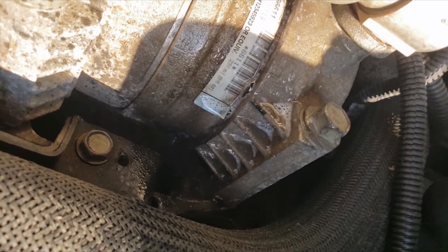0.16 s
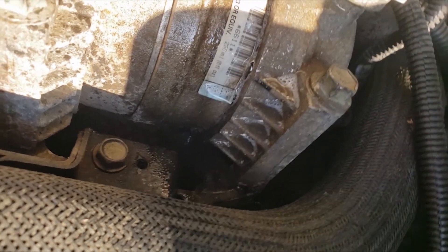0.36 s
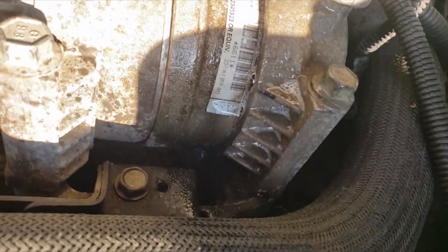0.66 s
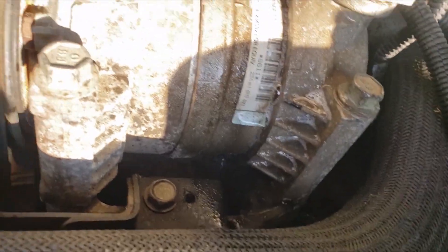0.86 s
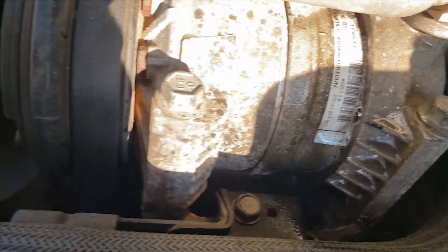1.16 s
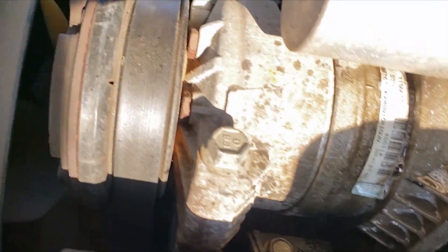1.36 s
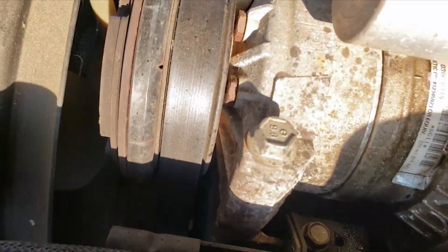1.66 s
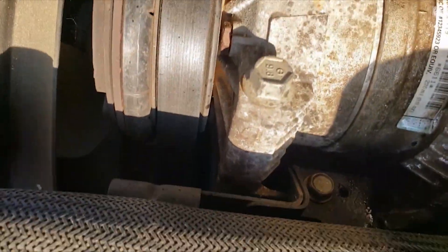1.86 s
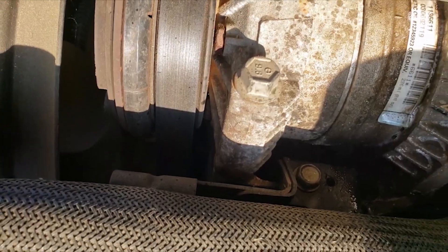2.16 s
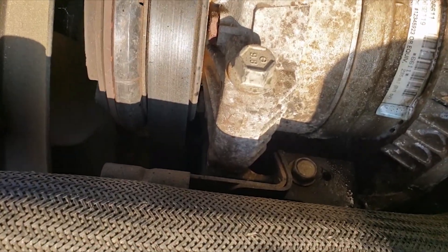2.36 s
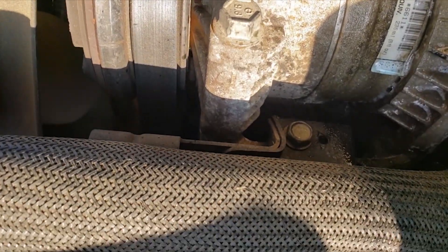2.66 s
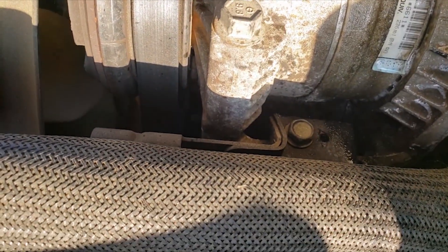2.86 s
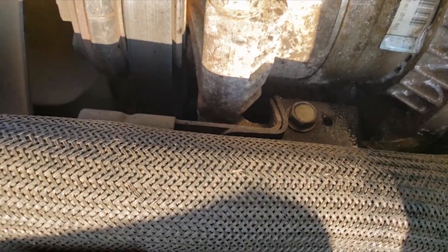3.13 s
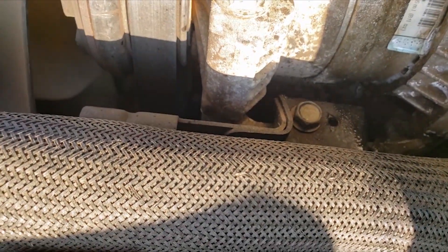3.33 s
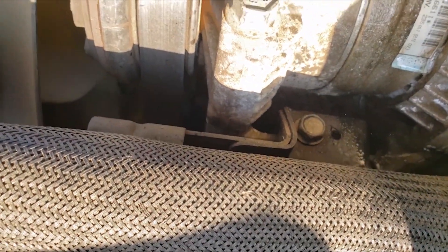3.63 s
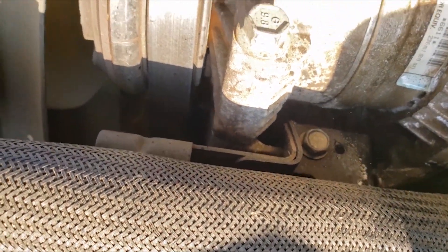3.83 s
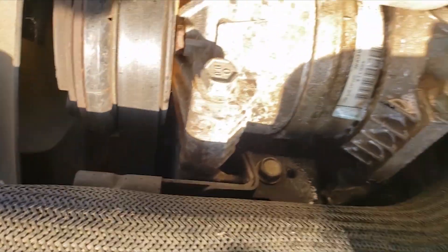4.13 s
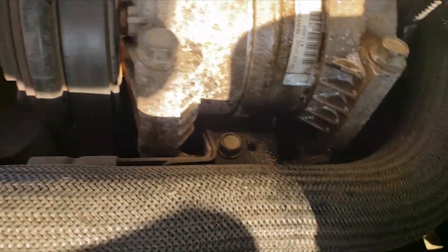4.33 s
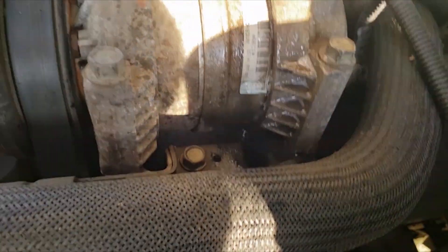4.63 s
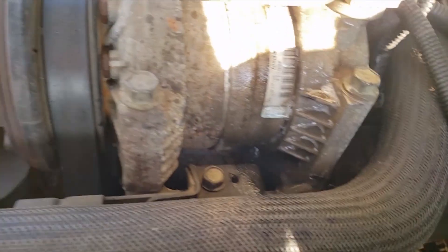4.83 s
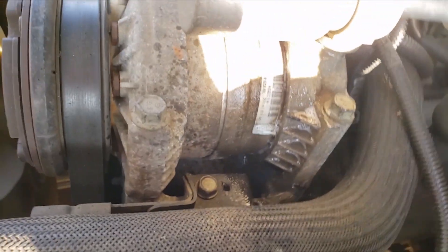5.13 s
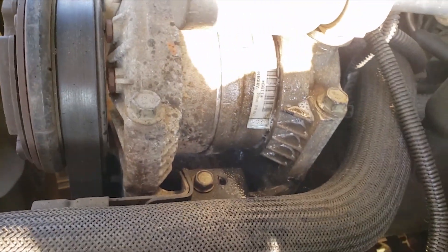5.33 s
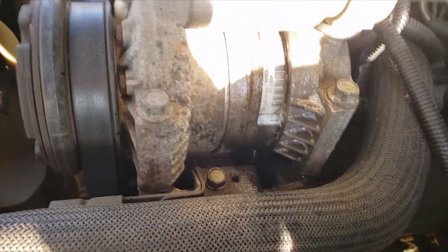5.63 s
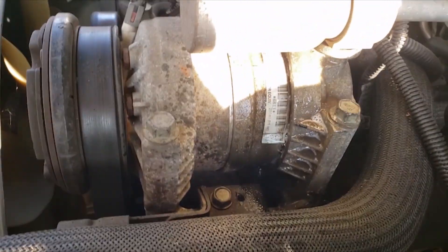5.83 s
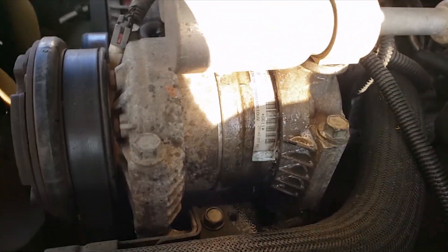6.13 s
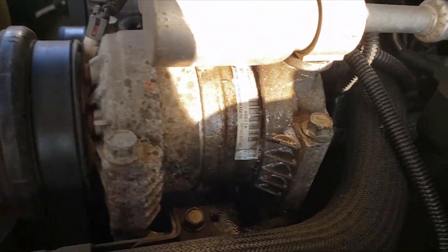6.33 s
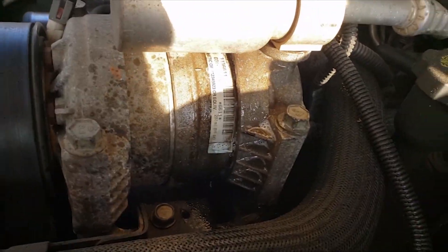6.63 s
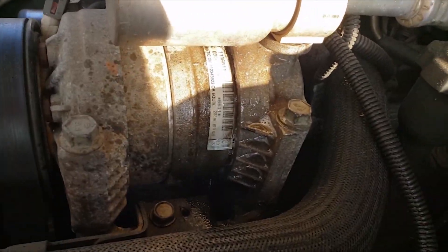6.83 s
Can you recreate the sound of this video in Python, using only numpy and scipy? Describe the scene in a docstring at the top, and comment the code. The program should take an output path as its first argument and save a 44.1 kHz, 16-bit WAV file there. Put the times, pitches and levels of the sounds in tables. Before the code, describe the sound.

At the open engine bay of a parked car, a hand scuffs softly over the parts and bumps hollow plastic close to the microphone. Near the middle, two hard knocks less than a second apart ring the bodywork, each with a small rebound and brief rattle. More light scrapes and ticks follow. Far birds whistle and chirp faintly over a low outdoor rumble, a distant hum and puffs of breeze.

```python
"""At the open engine bay of a parked car, engine off. Two hard knocks ring the bodywork, each with a
small rebound. Close by, a hand scuffs and scrapes over the parts, bumps hollow plastic and makes
small ticks. Far birds give two rising whistles and a few level notes, and a faint run of falling
chirps sits high in the treble. Behind it all are a low outdoor rumble, a far machine's hum,
puffs of breeze and a soft hiss."""
import sys
import numpy as np
from scipy import signal
from scipy.fft import rfft, irfft, next_fast_len
from scipy.io import wavfile
from scipy.ndimage import uniform_filter1d

SR = 44100
rng = np.random.default_rng(int(sys.argv[2]) if len(sys.argv) > 2 else 0)


def waveform_to_disk(signal):
    """Save audio, clipped to [-1, 1], as 16-bit WAV at the path in sys.argv[1]."""
    frames = np.transpose(np.atleast_2d(signal))
    scaled = np.clip(frames, -1, 1) * 32767
    samples = np.round(scaled).astype(np.int16)
    wavfile.write(sys.argv[1], SR, samples)


N = 308170
TIME = np.arange(N) / SR
SIDES = np.array([[0.5], [-0.5]])   # splits a pan_db between left and right; above 0 is to the left

# Blows on the bodywork: start_s, strength_db, spot (place struck, 0 to 1), snap_db, rattle_db
KNOCKS = [(2.7895, 3.5, 0.06, 7.5, 8.5), (2.8108, -14, 0, -25, -4), (2.859, -14, 0.05, -42, -6.5),
          (3.1831, -19, 0.4, -57, -23), (3.4781, -12, 0, -15, -4), (3.5098, 3.5, 0.6, 1.5, 7.5),
          (3.5759, -14.5, 0.93, -55, -32)]
# The bodywork's ringing tones: pitch_hz, ring_s (time to fall 60 dB), spot_0_db, spot_1_db
BODY_TONES = [(90.5, .18, -38, -43), (101, 0.15, -28.5, -22), (116, .045, -18.5, -19.5),
              (133.5, 0.17, -23, -15.5), (152, 0.19, -25, -39), (206.8, 0.18, -20.5, -16.5),
              (253.5, 0.11, -18, -20.5), (279, 0.11, -18.5, -13.5), (313, 0.14, -37, -32.5),
              (347, .16, -21, -37), (403, 0.1, -25, -37), (444, 0.16, -29.5, -30), (492.6, 0.18, -28, -37),
              (527.5, .13, -32, -32), (599, 0.084, -26, -24.5), (686, 0.13, -39, -27), (747, .09, -32, -27),
              (782, .09, -27, -28), (828, 0.11, -33, -42), (880, .1, -45, -37), (918, 0.12, -35, -34),
              (1040, 0.16, -42, -42), (1100, .11, -38, -37), (1187, .13, -49, -41),
              (1403, 0.081, -36.5, -24.5), (1500, 0.077, -44, -36.5), (1764, .06, -32, -59),
              (2115, 0.045, -39, -53), (2733, 0.026, -31, -44.5)]
# Which side those tones lean to: pitch_hz, pan_db
BODY_PAN = [(90, 3), (160, -4), (270, -5.5), (500, 3.5), (1400, -4), (2700, -13)]
# Colour (strength from low to high) of a blow's first snap: pitch_hz, spot_0_db, spot_1_db
SNAP_COLOUR = [(500, 20, 10), (900, 18, 10), (1300, 2, 4), (2000, -1, -8), (2750, -2, -2), (3400, -9, -8),
               (4300, -6, 5), (5400, -9, 1), (6700, -1, 8), (7600, -9, 1), (8600, -28, -20),
               (12000, -22, -13), (16000, -30, -20)]
# How long the snap lasts, shortest in the treble: pitch_hz, ring_s
SNAP_DECAY = [(600, 0.049), (2700, 0.033), (6500, .012), (14000, 0.016)]
# Colour of loose parts shaken by a blow: pitch_hz, level_db
RATTLE_COLOUR = [(50, -17), (100, 0), (250, 3.5), (450, 2), (780, -9.5), (1050, -11.5), (1400, -10),
                 (2500, -21.5), (4500, -30.5), (6700, -29.5), (9000, -38), (15000, -46)]
# How long they ring on: pitch_hz, ring_s
RATTLE_DECAY = [(80, 0.54), (250, 0.27), (600, 0.24), (1500, 0.18), (4000, 0.19), (14000, 0.15)]

# Fingers bumping a hollow plastic part: start_s, level_db, ring_s, pan_db
BUMPS = [(0.0652, -61.5, 0.09, -22), (0.9402, -50, 0.019, -2), (1.175, -51.5, 0.078, 4),
         (1.1932, -44, 0.098, -0.5), (1.201, -38, 0.021, 4), (1.268, -49, 0.075, 1),
         (1.2970, -57.5, 0.15, -2), (3.2182, -41, 0.0075, -19), (5.4833, -42.5, 0.0098, -28.5),
         (5.5252, -43, 0.0083, -26), (6.1339, -50, 0.018, -15)]
# That part's tones: pitch_hz, level_db, ring_factor (times the bump's ring_s)
PLASTIC_TONES = [(210.4, 8.5, 0.96), (329, 7, 0.51), (471, -7, 1.8), (880, -6, 0.5), (966, -2.5, 0.65),
                 (1220, 4.5, 0.18), (1460, -8.5, 1.14), (1590, -14, 0.67), (2400, -14, 1.2)]
# Small ticks of the hand: start_s, ring_db, pitch_hz, snap_db, top_treble_db, pan_db
TICKS = [(0.0144, -53, 3170, -56, -16, -21), (0.0549, -46, 3500, -52, -6, -25),
         (0.0638, -36.5, 3550, -37, -8.5, -28.5), (0.258, -66, 7000, -45, 10, -8),
         (0.6518, -44, 6800, -61, -8, -6), (0.9395, -42, 3670, -53, -8, -7),
         (3.216, -55, 7200, -40, -4, -9), (4.91, -62, 5000, -46.5, 4, 14), (5.1835, -63, 7000, -44, 7, -3),
         (5.4826, -50, 5200, -36, -7, 6), (5.498, -46, 2400, -43, -4, -12),
         (5.526, -44, 2500, -45, -2, -13), (5.7355, -42, 7500, -45, 9, -10),
         (5.7457, -48, 2520, -44, 4, -13), (5.779, -53, 7000, -52, 0, -6),
         (5.8032, -56, 2700, -44.5, 2, -13), (6.0722, -36.5, 6700, -33, -3, 7),
         (6.405, -42, 7240, -48, -5, -5)]
# Colour of a tick: pitch_hz, level_db
TICK_COLOUR = [(200, 11), (700, -6), (1500, -1.5), (3500, -11), (5000, 3), (7000, 6), (9000, -17.5),
               (12000, 6), (16000, 6)]
# The hand sliding on a casing: start_s, length_s, hiss_db, sizzle_db, rub_db, pan_db (not for the rub)
SCUFFS = [(0.008, 0.15, -59.5, -69, -63, -9.5), (0.294, 0.36, -70, -61, -76, -1),
          (0.865, 0.53, -67.5, -69, -63.5, -3), (1.117, 0.13, -62, -53.5, -61.5, 3),
          (2.811, 0.078, -54.5, -60, -47.5, -3), (2.849, 0.065, -54, -55, -54.5, -3),
          (2.979, 0.07, -59.5, -59, -64, -3), (3.288, 0.07, -66, -65, -68.5, -4),
          (3.5, 0.11, -57, -53.5, -63, 0), (4.642, 0.031, -63, -64, -71, 8),
          (4.7, 0.059, -62.5, -61, -67.5, 8.5), (4.901, 0.047, -62, -60, -85, 9),
          (4.944, 0.063, -58, -54, -85, 13.5), (5.118, 0.13, -69, -64, -90, 12),
          (5.276, 0.12, -59.5, -55.5, -87, 13.5), (5.522, 0.067, -59.5, -56, -66, -5),
          (5.715, 0.32, -63, -59.5, -78, 0), (6.018, 0.57, -64.5, -61, -64.5, -1.5)]
# Colour of the sliding hand's hiss: pitch_hz, level_db
SCUFF_HISS_COLOUR = [(1500, -7), (3200, -0.5), (4500, 5.5), (7000, 8), (9000, -2), (12000, -0.5),
                     (15500, -1.5)]
# Colour of its lower rub: pitch_hz, level_db
SCUFF_RUB_COLOUR = [(150, -32), (400, 9), (700, 4), (1200, 4.5), (2500, 4.5), (4000, -2), (8000, -31)]
# Gritty scrapes of a fingertip: start_s, length_s, level_db, pan_db
SCRAPES = [(0.99, 0.5, -68, -4), (5.421, 0.16, -64, -13), (5.52, 0.19, -68.5, -8)]
# Tones that the grit sets ringing: pitch_hz, ring_s, level_db
GRIT_TONES = [(570, 0.0081, 4.5), (815, 0.025, 3), (1260, 0.0058, 0), (1760, 0.0092, 4), (2270, 0.011, 3.5),
              (2640, 0.015, 2)]

# Rising bird whistles: start_s, length_s, start_hz, top_hz, level_db, fade_db (over the whistle)
WHISTLES = [(0.524, 0.3, 3340, 4240, -62, 11), (4.709, 0.21, 3610, 4310, -62.5, -1)]
# Far bird calls on one pitch: start_s, length_s, level_db
FAR_CALLS = [(1.29, 0.47, -65.5), (1.982, 0.31, -67.5), (2.473, 0.23, -69), (3.66, 0.29, -71.5),
             (4.13, 0.25, -74), (4.396, 0.26, -70), (5.103, 0.54, -66)]
# A run of chirps that quickens, fades and comes back: time_s, chirps_until_next_row, level_db
CHIRP_RUN = [(0, 12, -95), (1.1, 2, -85), (1.328, 2, -69), (1.529, 3, -68), (1.714, 3, -67),
             (1.942, 3, -66), (2.184, 5, -68), (2.637, 4, -66), (3.021, 5, -67), (3.404, 3, -66),
             (3.617, 8, -67), (4.153, 5, -71), (4.427, 19, -75), (5.75, 6, -88), (6.247, 5, -71),
             (6.65, 4, -68), (7.02, 0, -71)]
# The chirps' overtones: pitch_multiple, level_db
CHIRP_OVERTONES = [(2, -6), (3, -3), (4, 2.5), (5, 3)]

# Colour of the outdoor rumble and the breeze: pitch_hz, level_db
RUMBLE_COLOUR = [(20, 5), (30, 2), (42, 4.5), (55, 2), (85, 3), (120, -3.5), (170, -14), (250, -21.5),
                 (500, -55.5)]
# Puffs of breeze on the microphone: start_s, length_s, level_db, pan_db
PUFFS = [(0.415, 0.05, -38, -7), (1.113, 0.088, -39, 0), (1.84, 0.14, -40, 11.5), (1.962, 0.16, -41, 16),
         (2.316, 0.059, -41, 15), (4.952, 0.09, -42.5, 14.5), (5.135, 0.072, -43, 11.5),
         (6.278, 0.18, -41.5, 1), (6.58, 0.1, -51, 2), (6.805, 0.23, -42, -1)]
# Tones of the far machine: pitch_hz, level_db
HUM_TONES = [(53.8, -51), (120, -57.5), (166.9, -60), (193.8, -63)]
# Colour of the low rush of the surroundings: pitch_hz, level_db
RUSH_COLOUR = [(100, 2.5), (200, 0.5), (290, 0.5), (400, -7.5), (600, -19), (1000, -28.5), (2000, -69)]
# How that rush slowly swells and sinks: time_s, level_db
RUSH_LEVEL = [(0.0, -68), (0.27, -64.5), (1.75, -63), (2.02, -56.5), (3.5, -59), (4.48, -65), (4.88, -65.5),
              (5.33, -59), (5.9, -65.5), (6.99, -58)]
# Colour of moving air, in the middle pitches: pitch_hz, level_db
AIR_COLOUR = [(600, -3), (1000, 0.5), (1350, -2), (1800, 3), (2400, 0), (3200, -7.5), (5000, -19)]
# How the air's sound rises and falls: time_s, level_db
AIR_LEVEL = [(0.0, -66.5), (0.95, -71), (1.09, -66), (2.41, -67.5), (2.8, -61), (2.94, -68), (4.3, -72),
             (5.6, -68), (6.3, -69), (6.99, -70)]
# Colour of the background hiss: pitch_hz, level_db
HISS_COLOUR = [(1500, -13), (3200, -5), (3900, 5), (4500, 3), (5500, 5), (7300, 9), (8700, -5), (10500, 0),
               (12500, 3.5), (16000, 3)]
# How the hiss drifts: time_s, level_db, pan_db
HISS_LEVEL = [(0.15, -64.5, 0), (0.42, -65, 1), (0.62, -66.5, -2), (0.82, -63.5, -2.5), (1.0, -63.5, 3),
              (1.45, -64, 3), (2.15, -62, 0), (2.35, -63.5, 0.5), (2.7, -61.5, -1), (3.7, -65, 1),
              (4.55, -64.5, -1), (5.1, -65, -1), (5.35, -60, 4), (5.68, -64.5, -4), (5.85, -67, 0),
              (6.4, -60, 0), (6.5, -64.5, 1), (6.99, -63.5, 2)]
# Which side the background hiss and sizzle lean to: pitch_hz, pan_db
HISS_PAN = [(2000, 0), (4500, 1.5), (7300, 0.5), (9200, 8.5), (12000, 3), (16000, 7.5)]
# Colour of sizzle, the thin top of the treble: pitch_hz, level_db
SIZZLE_COLOUR = [(7000, -9), (9500, -16.5), (11900, 4), (13000, -1), (14200, 3), (15300, 4)]
# How the background sizzle grows: time_s, level_db
SIZZLE_LEVEL = [(0, -85), (4.5, -71), (5.2, -68), (5.65, -71), (5.9, -63), (6.4, -62.5), (6.99, -64)]
# How alike a noise is on the left and right: pitch_hz, likeness (1 = the same, 0 = unrelated)
LIKENESS = [(40, 1), (300, 0.87), (600, 0.51), (1200, 0), (3000, 0), (16000, 0)]
# A noise that leans to neither side: pitch_hz, pan_db
CENTRED = [(20, 0), (16000, 0)]


def knocks(snap_gain_db=-14, click_db=10, snap_pan_db=-7, rattle_gain_db=-26, rattle_pan_db=-3):
    """Each blow is a click with its snap, the body's boom and a short rattle, mostly from the right."""
    out, t = np.zeros((2, N)), TIME[:SR // 3]
    for s, strength_db, spot, snap_db, rattle_db in KNOCKS:
        # a stiffer spot snaps brighter
        colour = [(hz, db_0 + spot * (db_1 - db_0)) for hz, db_0, db_1 in SNAP_COLOUR]
        snap = die_away(noise(colour, size=4096)[0], SNAP_DECAY) - from_db(click_db) * click(colour)
        add(out, s, body_ring(strength_db, spot, t))
        add(out, s, placed(from_db(snap_gain_db + snap_db) * snap, snap_pan_db, lag_s=0.00044))
        add(out, s, from_db(rattle_gain_db + rattle_db + SIDES * rattle_pan_db) * rattle(t))
    return out


def body_ring(strength_db, spot, t, softness=0.61, soft_above_hz=450):
    """The struck panel rings with many tones; the spot that is hit sets each one's share."""
    out = 0
    for hz, ring_s, db_0, db_1 in BODY_TONES:
        share_db = db_0 + spot * (db_1 - db_0)
        # a lighter blow stays longer in contact, so it loses more high tones than low ones
        blow_db = strength_db * (1 + softness * max(np.log2(hz / soft_above_hz), 0))
        travel_s = 0.0013 * np.sqrt(200 / hz)   # low tones cross a bending panel more slowly
        ring = -from_db(share_db + blow_db) * struck_tone(hz, ring_s, t - travel_s)
        out = out + placed(ring, at_hz(BODY_PAN, hz), lag_s=0.00028)
    return out


def rattle(t, rise_s=0.00066):
    """Many loose parts around the bay ring weakly and blend into a dying noise."""
    return die_away(noise(RATTLE_COLOUR, size=len(t)), RATTLE_DECAY) * (1 - np.exp(-t / rise_s))


def bumps():
    """A soft touch rings the hollow plastic; a finger that stays on it cuts the ring short."""
    out, t = np.zeros((2, N)), TIME[:SR // 4]
    for s, db, ring_s, pan_db in BUMPS:
        ring = sum((-1) ** k * from_db(tone_db) * struck_tone(hz, ring_s * factor, t)
                   for k, (hz, tone_db, factor) in enumerate(PLASTIC_TONES))
        add(out, s, placed(from_db(db) * ring, pan_db))
    return out


def ticks(snap_s=0.0052, ring_s=0.0065, echo_s=0.4, echo_db=-23, top_treble_hz=8000):
    """Each tick of the hand is a dry snap, a brief ring of the casing and a faint echo from the bay."""
    out, t = np.zeros((2, N)), TIME[:4096]
    for s, ring_db, pitch_hz, snap_db, top_db, pan_db in TICKS:
        colour = [(hz, db + top_db * (hz > top_treble_hz)) for hz, db in TICK_COLOUR]
        snap = from_db(snap_db - 60 * t / snap_s) * unit_level(noise(colour, size=len(t))[0])
        ring = from_db(ring_db) * struck_tone(pitch_hz, ring_s, t)
        echo = from_db(snap_db + echo_db - 60 * t / echo_s) * noise(colour, size=len(t))
        add(out, s, placed(snap + ring, pan_db) + echo)
    return out


def scuffs(grain_db=2.5, rub_pan_db=-4):
    """Sliding skin catches and lets go, so its hiss is grainy."""
    grain = from_db(grain_db * wobble(smooth_samples=160))
    hiss, sizzle, rub = 0, 0, 0
    for s, length, hiss_db, sizzle_db, rub_db, pan_db in SCUFFS:
        pressure = stroke(s, length)
        hiss = hiss + from_db(hiss_db + SIDES * pan_db) * pressure
        sizzle = sizzle + from_db(sizzle_db + SIDES * pan_db) * pressure
        rub = rub + from_db(rub_db + SIDES * rub_pan_db) * pressure
    treble = hiss * noise(SCUFF_HISS_COLOUR) + sizzle * noise(SIZZLE_COLOUR)
    return bay_echoes(grain * (treble + rub * noise(SCUFF_RUB_COLOUR)))


def scrapes(grains_per_s=500, spread_db=6):
    """Grit under a fingertip catches unevenly; each catch rings the surface for an instant."""
    catches = rng.random(N) < grains_per_s / SR
    strength = from_db(spread_db * np.minimum(rng.exponential(1, N), 3))
    crackle = 0
    for hz, ring_s, db in GRIT_TONES:
        kicks = catches * strength * rng.standard_normal(N)
        ring = from_db(db) * struck_tone(hz, ring_s, TIME[:SR // 40])
        crackle = crackle + signal.fftconvolve(kicks, ring)[:N]
    level = sum(from_db(db + SIDES * pan_db) * stroke(s, length) for s, length, db, pan_db in SCRAPES)
    return bay_echoes(level * unit_level(crackle))


def bird_whistles(blur_hz=245, overshoot=1.3):
    """A bird's hoarse whistle slides up, then turns over at the top and dips."""
    blur, out = slow_noise(blur_hz), 0
    for s, length, start_hz, top_hz, db, fade_db in WHISTLES:
        progress = np.clip((TIME - s) / length, 0, 1)
        pitch_hz = start_hz + (top_hz - start_hz) * np.sin(np.pi / 2 * overshoot * progress) ** 2
        phase = 2 * np.pi * np.cumsum(pitch_hz) / SR
        level = from_db(db - fade_db * (progress - 0.5)) * swell(s, length) ** 2
        out = out + level * (blur[0] * np.cos(phase) + blur[1] * np.sin(phase))
    return out


def far_calls(pitch_hz=1790, blur_hz=135, pan_db=-6):
    """Bird notes on one pitch swell and fade, blurred by distance."""
    blur = slow_noise(blur_hz)
    level = sum(from_db(db) * swell(s, length) ** 2 for s, length, db in FAR_CALLS)
    phase = 2 * np.pi * pitch_hz * TIME
    return from_db(SIDES * pan_db) * level * (blur[0] * np.cos(phase) + blur[1] * np.sin(phase))


def chirps(top_hz=4400, bottom_hz=2750, rough_hz=115, flicker_db=3.5, sizzle_db=8, pan_db=9):
    """Thin, sizzling chirps grow as they slide down; only the overtones of the sliding pitch sound."""
    times, counts, levels = np.transpose(CHIRP_RUN)
    so_far, level_db = over_time(np.transpose([times, np.cumsum(counts) - counts, levels]))
    progress = np.minimum((so_far + 0.37) % 1 / 0.55, 1)   # a chirp fills 55% of its turn, then rests
    pitch_hz = top_hz + (bottom_hz - top_hz) * progress + rough_hz * wobble(smooth_samples=30)
    phase = 2 * np.pi * np.cumsum(pitch_hz) / SR
    flickers = from_db(flicker_db * wobble(smooth_samples=200, shape=(len(CHIRP_OVERTONES), N)))
    overtones = sum(from_db(db) * flicker * np.sin(multiple * phase)
                    for (multiple, db), flicker in zip(CHIRP_OVERTONES, flickers))
    sizzle = from_db(sizzle_db + SIDES * pan_db) * noise(SIZZLE_COLOUR)
    level = from_db(level_db - 4.5) * np.sqrt(np.abs(np.sin(np.pi * progress ** 2)))
    return level * (placed(overtones, pan_db) + sizzle)


def breeze():
    """Puffs of wind catch the microphone and rumble, often more on one side."""
    level = sum(from_db(db + SIDES * pan_db) * swell(s, length) for s, length, db, pan_db in PUFFS)
    return level * noise(RUMBLE_COLOUR)


def machine_hum():
    """A far machine holds a few steady low tones."""
    return sum(from_db(db) * np.sqrt(2) * np.sin(2 * np.pi * (hz * TIME + rng.random()))
               for hz, db in HUM_TONES)


def outdoor_rumble(rumble_db=-45.5, follow_share=0.32, rush_gain_db=3.5):
    """A low, distant rush swells and sinks, and a deeper rumble partly follows it."""
    rush_db, = over_time(RUSH_LEVEL)
    rumble = from_db(rumble_db + follow_share * (rush_db - rush_db.mean())) * noise(RUMBLE_COLOUR)
    return rumble + from_db(rush_gain_db + rush_db) * noise(RUSH_COLOUR)


def air_and_hiss(air_gain_db=0.5, air_pan_db=-6):
    """Moving air, a soft hiss and a thin sizzle, all echoing in the bay."""
    (air_db,), (sizzle_db,) = over_time(AIR_LEVEL), over_time(SIZZLE_LEVEL)
    hiss_db, hiss_pan_db = over_time(HISS_LEVEL)
    air = from_db(air_gain_db + air_db + SIDES * air_pan_db) * noise(AIR_COLOUR)
    hiss = from_db(hiss_db + SIDES * hiss_pan_db) * noise(HISS_COLOUR, pan=HISS_PAN)
    sizzle = from_db(sizzle_db) * noise(SIZZLE_COLOUR, pan=HISS_PAN)
    return bay_echoes(air) + bay_echoes(hiss + sizzle, echo_db=-14)


def bay_echoes(sound, echo_db=-13, soonest_s=0.0006, latest_s=0.007, count=6):
    """Quick echoes between the engine parts colour a sound, differently on each side."""
    lags = (rng.uniform(soonest_s, latest_s, (2, count)) * SR).astype(int)
    echoes = np.array([sum((-1) ** k * np.roll(side, lag) for k, lag in enumerate(row))
                       for side, row in zip(sound, lags)])
    return (sound + from_db(echo_db) * echoes) / np.sqrt(1 + count * from_db(echo_db) ** 2)


def panel_bass_loss(sound, lowest_hz=75):
    """A panel gives off little sound below its lowest tones."""
    return filtered(sound, 3, lowest_hz, "high")


def struck_tone(hz, ring_s, age_s):
    """A tone that is silent until struck, then falls 60 dB in ring_s."""
    age_s = np.maximum(age_s, 0)
    return from_db(-60 * age_s / ring_s) * np.sin(2 * np.pi * hz * age_s)


def click(colour, size=4096):
    """One sharp pulse of a given colour, with energy 1."""
    hz = np.maximum(np.arange(size // 2 + 1) * SR / size, 1)
    cepstrum = irfft(np.log(colour_gain(colour, hz)))
    # folding the late half onto the early half packs the energy at the pulse's start
    cepstrum[1:size // 2] *= 2
    cepstrum[size // 2 + 1:] = 0
    pulse = irfft(np.exp(rfft(cepstrum)))
    return pulse / np.sqrt(np.sum(pulse ** 2))


def noise(colour, size=N, pan=CENTRED):
    """Stereo noise of a given colour, alike on both sides only at low pitches."""
    padded = next_fast_len(size)
    hz = np.maximum(np.arange(padded // 2 + 1) * SR / padded, 1)
    shared, opposed = rfft(rng.standard_normal((2, padded)))
    alike = np.clip(at_hz(LIKENESS, hz), -1, 1)
    stereo = np.sqrt(1 + alike) * shared + np.sqrt(1 - alike) * opposed * np.sign(SIDES)
    gain = colour_gain(colour, hz) * from_db(SIDES * at_hz(pan, hz))
    return unit_level(irfft(gain * stereo, padded)[:, :size])


def colour_gain(colour, hz):
    """A colour's strength at each pitch, falling away below its first row."""
    return from_db(at_hz(colour, hz)) / np.sqrt(1 + (colour[0][0] / hz) ** 4)


def die_away(sound, decay):
    """Each octave of a sound dies at its own rate."""
    t, out = TIME[:sound.shape[-1]], 0
    for hz in 45 * 2. ** np.arange(9):
        octave = filtered(sound, 2, [hz / np.sqrt(2), hz * np.sqrt(2)], "band")
        out = out + octave * from_db(-60 * t / at_hz(decay, hz))
    return out


def slow_noise(top_hz):
    """Two slow stereo noises, used to blur a pure tone."""
    return unit_level(filtered(rng.standard_normal((2, 2, N)), 2, top_hz, "low"))


def wobble(smooth_samples, shape=N):
    """A random waver; more smoothing makes it slower."""
    return unit_level(uniform_filter1d(rng.standard_normal(shape), size=smooth_samples))


def stroke(s, length, peak_at=0.19):
    """A rub builds quickly to 1 and tails off."""
    progress = np.clip((TIME - s) / length, 0, 1)
    return np.sin(np.pi / 2 * np.minimum(progress / peak_at, (1 - progress) / (1 - peak_at)))


def swell(s, length):
    """A rounded rise to 1 and back."""
    out, inside = np.zeros(N), slice(*np.searchsorted(TIME, [s, s + length]))
    out[inside] = np.sqrt(np.abs(np.sin(np.pi * (TIME[inside] - s) / length)))
    return out


def placed(sound, pan_db, lag_s=0):
    """Make a sound louder on one side; it reaches the left lag_s later."""
    t = TIME[:len(sound)]
    return from_db(SIDES * pan_db) * np.array([np.interp(t - lag_s, t, sound, left=0), sound])


def add(out, s, sound):
    """Mix a short stereo sound in at time s."""
    start = int(np.clip(round(s * SR), 0, N - 1))
    out[:, start:start + sound.shape[-1]] += sound[:, :N - start]


def over_time(rows):
    """One curve for each column after the times."""
    times, *columns = np.transpose(rows)
    return [np.interp(TIME, times, column) for column in columns]


def at_hz(rows, hz):
    """Read between a table's rows, with octaves evenly spaced."""
    pitches, values = np.transpose(rows)
    return np.interp(np.log(hz), np.log(pitches), values)


def filtered(sound, steepness, hz, keep):
    """Keep the lows, the highs or a band."""
    return signal.sosfilt(signal.butter(steepness, hz, keep, fs=SR, output="sos"), sound)


def from_db(db):
    """Turn decibels into a multiplier."""
    return 10 ** (np.asarray(db) / 20)


def unit_level(sound):
    """Scale to an average (rms) level of 1."""
    return sound / np.sqrt(np.mean(sound ** 2) + 1e-20)


def scene():
    """Everything heard at the bay, added together."""
    bodywork = panel_bass_loss(knocks())
    hand = bumps() + ticks() + scuffs() + scrapes()
    background = breeze() + machine_hum() + outdoor_rumble() + air_and_hiss()
    birds = bird_whistles() + far_calls() + chirps()
    return bodywork + hand + birds + background


def record(dry, ceiling=0.77, low_cut_hz=52, high_cut_hz=15850):
    """The microphone rounds the loudest peaks and drops the deepest bass and the highest treble."""
    rounded = ceiling * np.tanh(dry / ceiling)
    thinned = filtered(rounded, 4, low_cut_hz, "high")
    return signal.sosfilt(signal.ellip(10, 0.2, 70, high_cut_hz, fs=SR, output="sos"), thinned)


dry = scene()
out = record(dry)
waveform_to_disk(out)
```